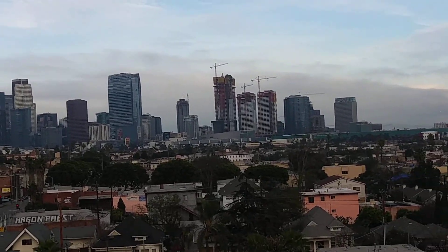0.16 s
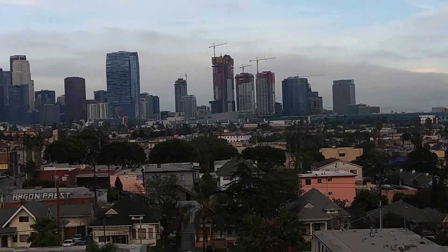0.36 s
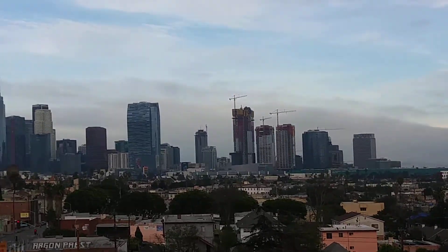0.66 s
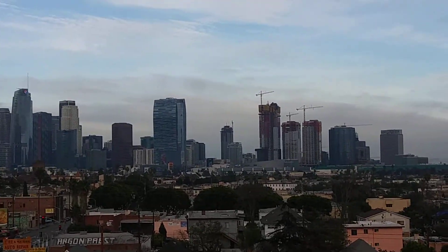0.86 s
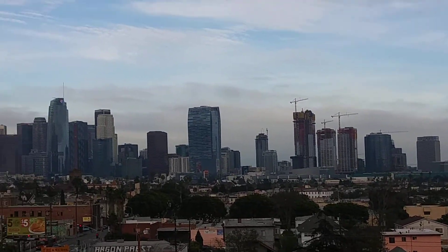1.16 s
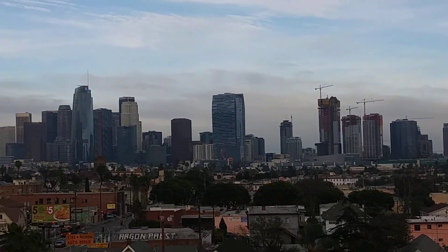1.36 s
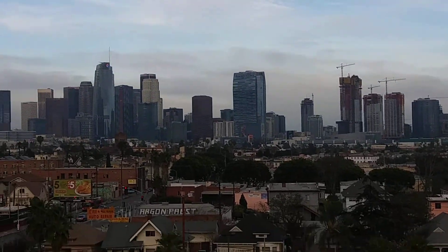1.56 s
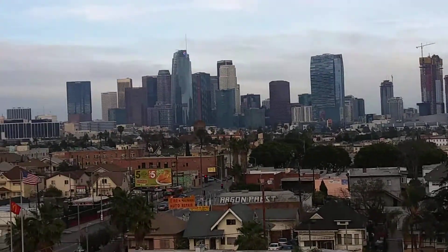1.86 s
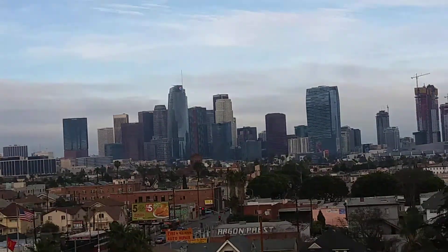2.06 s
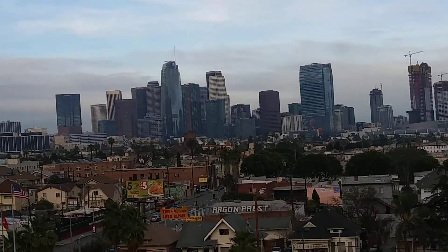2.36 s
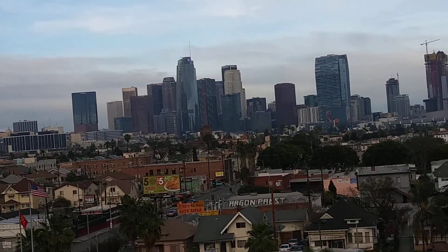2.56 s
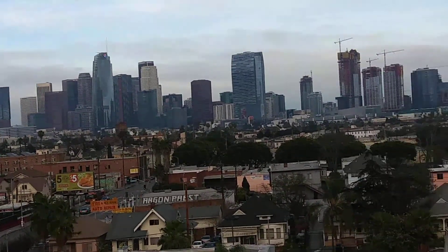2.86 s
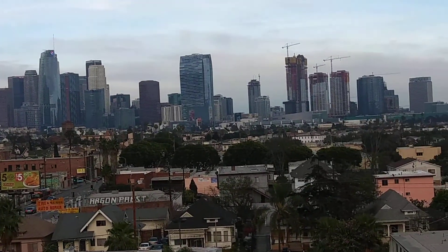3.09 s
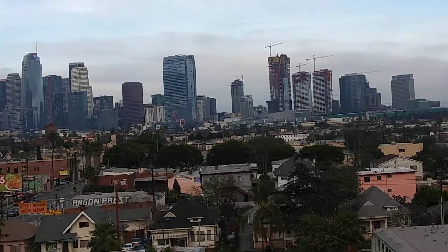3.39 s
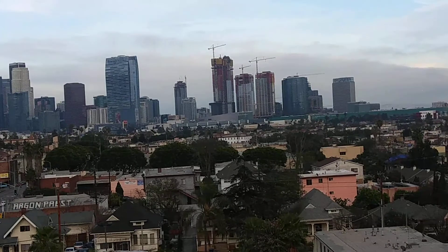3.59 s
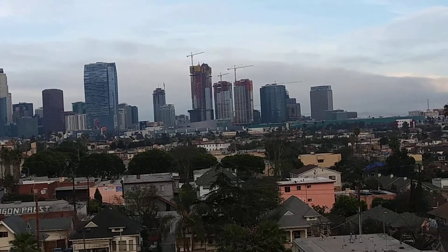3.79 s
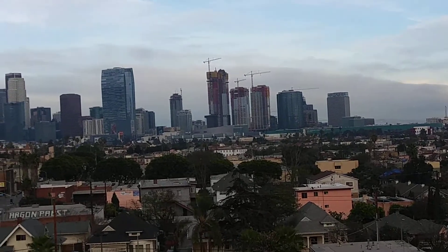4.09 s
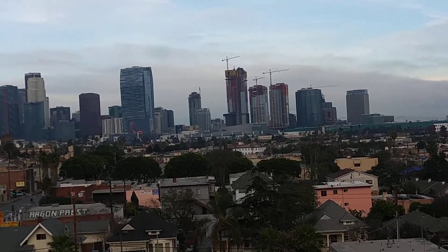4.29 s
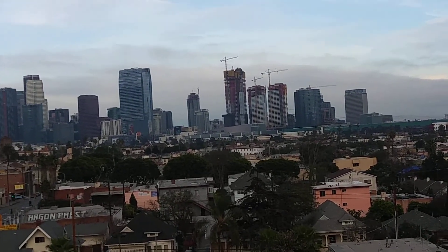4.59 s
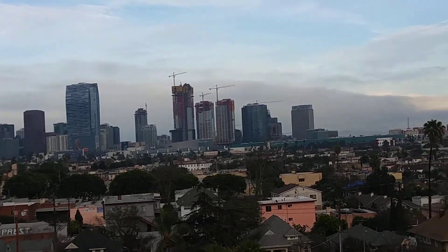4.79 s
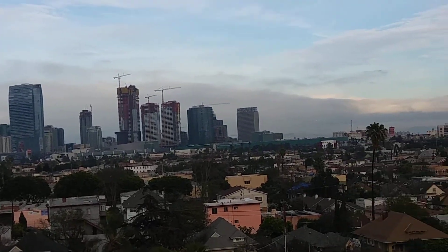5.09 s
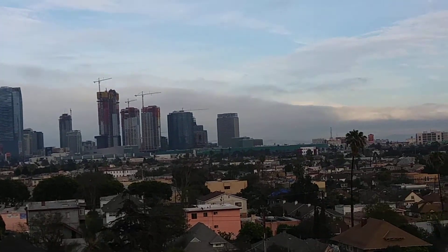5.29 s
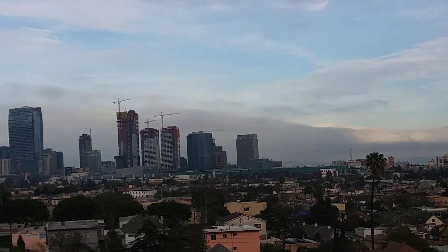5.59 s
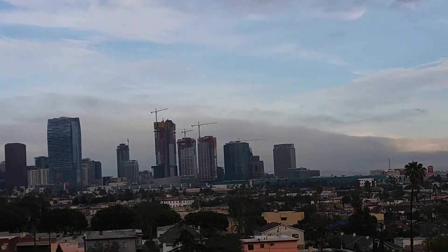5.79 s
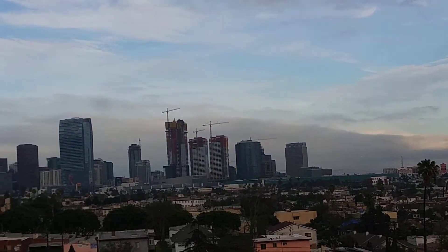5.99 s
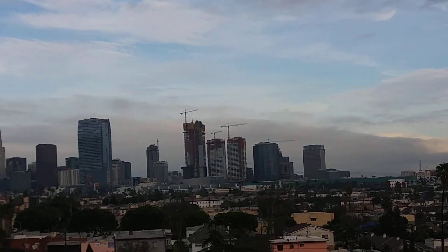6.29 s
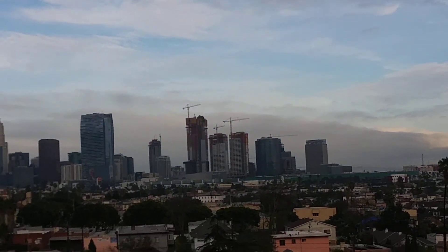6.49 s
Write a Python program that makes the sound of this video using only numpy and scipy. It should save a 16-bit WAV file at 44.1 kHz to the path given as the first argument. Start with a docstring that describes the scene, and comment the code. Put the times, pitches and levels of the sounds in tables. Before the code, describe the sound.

Close knocks, clatter and clicks of a handled phone over a low, wavering engine-like hum, a thin whine and distant city traffic.

```python
"""A low engine-like hum wanders in pitch under a thin steady whine, heard on a hand-held phone over a city.
Close by come a hollow knock ringing a body's modes, a hard clatter of rebounding parts and light clicks,
each with a short reverberant tail. The hand rubs and bumps the phone's case. There is one sharp click.
Behind it all lie rumble, a wash of traffic, a flickering hiss and a few faint, far squeals."""
import sys
import numpy as np
from scipy import signal
from scipy.fft import rfft, irfft, next_fast_len
from scipy.io import wavfile

SR = 44100
rng = np.random.default_rng(int(sys.argv[2]) if len(sys.argv) > 2 else 0)


def int16_out(signal):
    """Quantize to a 16-bit WAV file."""
    q = np.round(np.clip(np.atleast_2d(signal).T, -1, 1) * 32767)
    wavfile.write(sys.argv[1], SR, q.astype(np.int16))


N = 293264
TIME = np.arange(N) / SR


def from_db(db):
    """Decibels to gain."""
    return 10 ** (np.asarray(db) / 20)


def rms_one(x):
    """Scale to rms 1."""
    return x / np.sqrt(np.mean(x ** 2) + 1e-20)


def automation(points):
    """Read a breakpoint curve at every sample."""
    return np.interp(TIME, *np.transpose(points))


def at_hz(points, hz):
    """Read a table on a log-frequency axis."""
    freqs, values = np.transpose(points)
    return np.interp(np.log(hz + 1e-9), np.log(freqs), values)


def drift(rate_hz):
    """Smooth random modulation, rms 1."""
    hop, warm_up = 40, 2000
    pole = np.exp(-2 * np.pi * rate_hz * hop / SR)
    white = rng.standard_normal(N // hop + warm_up + 2)
    slow = signal.lfilter([1], [1, -2 * pole, pole * pole], white)[warm_up:]
    return np.interp(np.arange(N) / hop, np.arange(len(slow)), rms_one(slow))


def noise(colour):
    """Noise shaped by an EQ curve, rms 1."""
    size = next_fast_len(N)
    hz = np.arange(size // 2 + 1) * SR / size
    spectrum = rfft(rng.standard_normal(N), size) * from_db(at_hz(colour, hz))
    return rms_one(irfft(spectrum, size)[:N])


def cut(x, hz, kind, order):
    """Butterworth filter."""
    return signal.sosfilt(signal.butter(order, hz, kind, fs=SR, output="sos"), x)


def resonate(x, hz, width_hz):
    """A resonator with unity gain at its peak."""
    r = np.exp(-np.pi * width_hz / SR)
    feedback = [1, -2 * r * np.cos(2 * np.pi * hz / SR), r * r]
    return signal.lfilter(np.array([1, 0, -1]) * (1 - r * r) / 2, feedback, x + 1e-18)


def narrow_band(x, hz, width_hz):
    """Two resonators in series, rms 1."""
    return rms_one(resonate(resonate(x, hz, width_hz), hz, width_hz))


def add(out, start_s, sound):
    """Mix a sound in at a time."""
    start = max(round(start_s * SR), 0)
    out[start:start + len(sound)] += sound[:N - start]


def envelope(start_s, length_s, attack, release=0.42):
    """Rise, hold at 1 and fall; attack and release are shares of the length."""
    progress = (TIME - start_s) / length_s
    return np.clip(np.minimum(progress / attack, (1 - progress) / release), 0, 1)


def swell(crest_s, half_width_s, gain_db):
    """A bell-shaped rise and fall, in dB."""
    return gain_db * np.exp(-((TIME - crest_s) / half_width_s) ** 2)


# noise floor EQ (frequency [Hz], level [dB])
MIC_EQ = [(5000, 0), (9000, -3), (16000, -9)]

def mic_noise():
    """The microphone's own faint, steady noise."""
    return from_db(-82.5) * noise(MIC_EQ)


# EQs of the low rumble and the traffic wash (frequency [Hz], level [dB])
RUMBLE_EQ = [(15, -25), (30, -23), (45, -4), (65, 25), (90, 23.5), (125, 21.5), (160, 14), (300, 0),
             (500, -44)]
TRAFFIC_EQ = [(76, -5.5), (130, -3), (339, -8), (368, -9.5), (405, -12.5), (456, -9.5), (495, -16),
              (1030, -14.5), (1340, -18.5), (1910, -21), (2050, -24), (2200, -23), (2860, -48),
              (4840, -120)]

def city():
    """The bed: rumble and traffic dulled by distance, both swelling slowly."""
    rumble = from_db(-36.5 + swell(crest_s=3.7, half_width_s=1.7, gain_db=6.5)) * noise(RUMBLE_EQ)
    wash = cut(noise(TRAFFIC_EQ), 2260, "low", order=14)
    wash = cut(wash, 55, "high", order=3)
    return rumble + from_db(-33 + swell(crest_s=3.9, half_width_s=3.6, gain_db=4.03)) * wash


HISS_START_S, HISS_FADE_S, HISS_CREST_S = 1, 0.35, 5.65
# hiss EQ (frequency [Hz], level [dB])
HISS_EQ = [(2000, -8), (2300, 0), (2600, -3), (3100, -7), (3400, -20), (3900, -18), (4150, -21),
           (4450, -35), (8000, -51), (12000, -70)]
# flickering treble bands (centre [Hz], width [Hz], level [dB])
FLICKER_BANDS = [(2950, 220, -66), (3716, 140, -62.5), (4012, 70, -63.5), (5100, 560, -79.5),
                 (8016, 400, -80.5)]

def hiss():
    """A faint, flickering hiss fades up, builds slowly to a crest and recedes."""
    ramp_db = -3.5 * np.abs(TIME - HISS_CREST_S)
    out = from_db(-46.5 + ramp_db + 1.5 * drift(12)) * noise(HISS_EQ)
    for hz, width_hz, db in FLICKER_BANDS:
        band = narrow_band(rng.standard_normal(N), hz, width_hz)
        out += from_db(db + 0.77 * ramp_db + 4.3 * drift(6)) * band
    fade_up = np.clip((TIME - HISS_START_S) / HISS_FADE_S, 0.2, 1)
    return fade_up * out


def treble_puffs(puffs_per_s=31, puff_s=0.08, low_hz=2660, high_hz=5640, db_per_octave=-10):
    """Once the hiss is in, faint, narrow puffs of high noise flicker at random; higher ones are weaker."""
    out, white = np.zeros(N), rng.standard_normal(N)
    count = int(puffs_per_s * (N / SR - HISS_START_S))
    for when, height, strength, length in rng.random((count, 4)):
        start_s = np.interp(when, [0, 1], [HISS_START_S + HISS_FADE_S, N / SR - puff_s])
        end_s = start_s + puff_s * (.5 + length)
        octaves = height * np.log2(high_hz / low_hz)
        puff = narrow_band(white[int(start_s * SR):int(end_s * SR)], low_hz * 2 ** octaves, width_hz=220)
        level_db = -62.5 + db_per_octave * octaves + 6.5 * (2 * strength - 1)
        add(out, start_s, from_db(level_db) * np.hanning(len(puff)) * puff)
    return out


# EQ of the rough edge (frequency [Hz], level [dB])
RASP_EQ = [(3300, -28), (4050, 0), (4500, -21), (5150, 0.5), (5800, -18), (7900, -10.5), (9000, -13),
           (11000, -46)]
# squeal cues (time [s], length [s], pitch [Hz], glide [Hz/s], level [dB])
SQUEAL_CUES = [(3.39, 0.43, 818, 135, -39.5), (5.24, 0.35, 6350, 148, -57), (4.5, 0.37, 3000, 0, -55.5),
               (5.23, 0.18, 4050, 0, -57), (6.1, 0.19, 6800, 899, -65)]

def squeals():
    """Far, wavering tones, some gliding upward; a rasp of noise roughens one high pair."""
    rasp_gain = from_db(-62.5 + 4.5 * drift(25)) * envelope(start_s=5.2, length_s=0.3, attack=0.15)
    out = rasp_gain * noise(RASP_EQ)
    for start_s, length_s, hz, glide, level_db in SQUEAL_CUES:
        pitch = (hz + glide * (TIME - start_s)) * (1 + 0.0065 * drift(110))
        tone = np.sin(2 * np.pi * np.cumsum(pitch) / SR)
        out += from_db(level_db + 2 * drift(28)) * envelope(start_s, length_s, attack=0.15) * tone
    return out


def click(time_s=3.645):
    """One brief, sharp click: a sudden step that dies away at once."""
    out = np.zeros(N)
    add(out, time_s, -from_db(-12) * np.exp(-TIME[:SR // 5] / .0008))
    return out


# resonances of the hard parts (frequency [Hz], width [Hz], level [dB])
PART_MODES = [(1015, 40, -5), (1470, 50, -3), (1794, 14, 4), (1906, 40, 1), (2111, 14, 3), (2170, 25, -1),
              (2308, 14, -1), (2905, 30, 3), (2975, 25, 1), (3730, 35, 2), (3850, 30, -2), (4374, 50, -4),
              (4842, 40, 2), (5220, 60, -3), (5780, 40, 2), (6200, 40, -1), (6337, 45, 3), (6830, 25, -5),
              (7415, 40, 0), (7850, 60, -4), (8280, 39, -4), (8970, 100, -5)]

def hard_parts(x, ring_db):
    """Small stiff parts ring along with whatever excites them."""
    ring = sum(from_db(db) * resonate(x, hz, width_hz) for hz, width_hz, db in PART_MODES)
    return x + from_db(ring_db) * ring


# EQs of the dull and bright friction layers (frequency [Hz], level [dB])
DULL_RUB_EQ = [(2000, 5), (2900, 8), (3700, 9), (5000, 6), (6500, -7), (8500, -15.5), (16000, -31.5)]
BRIGHT_RUB_EQ = [(3000, -3.5), (7000, -2.5), (10000, -6.5), (13000, -16.5), (16000, -22.5)]
# finger slides (time [s], length [s], level [dB], bright layer [dB])
RUB_CUES = [(1.563, 0.3, -59.5, -32), (1.86, 0.15, -49, -31), (2.031, 0.29, -54, -22),
            (2.5, 0.17, -66, -22), (3.19, 0.21, -49, -1)]
# soft bumps on the case (time [s], level [dB], pitch [Hz])
BUMP_CUES = [(0.658, -15, 90), (3.658, -10.5, 110), (3.78, -9.5, 110), (3.831, -15, 63.07),
             (3.925, -2.5, 161), (4.029, -8, 110), (4.101, -9.5, 180), (5.54, -14.5, 75), (5.618, -15, 75)]

def hand():
    """Skin slips on the case in small grains and bumps it in damped thuds."""
    out, t = np.zeros(N), TIME[:SR // 5]
    dull, bright = hard_parts(noise(DULL_RUB_EQ), ring_db=3), noise(BRIGHT_RUB_EQ)
    grain = from_db(3.5 * drift(35))
    for start_s, length_s, level_db, bright_db in RUB_CUES:
        friction = grain * (dull + from_db(bright_db) * bright)
        out += from_db(level_db) * envelope(start_s, length_s, attack=0.35) * friction
    for start_s, level_db, hz in BUMP_CUES:
        thud = np.sin(2 * np.pi * hz * t) + from_db(-3.5) * np.sin(2 * np.pi * 1.3 * hz * t)
        attack = 1 - np.exp(-t / .003)
        add(out, start_s, from_db(level_db + 1 - 60 * t / 0.063) * attack * thud)
    return out


# reverb decay of the surroundings (frequency [Hz], t60 [s])
REVERB_DECAY = [(200, .7), (1000, 0.66), (3000, 0.47), (6000, 0.39), (10000, 0.33), (16000, .3)]

def impacts(hits, colour, rise_s, ring_t60, crack_db, tail_db):
    """Each hit is banded noise: a crack, a dense ring that dies sooner in the treble, a reverb tail."""
    t, out = TIME[:SR * 3 // 5], np.zeros(N)
    edges = np.geomspace(140, 17000, 17)
    centres = np.sqrt(edges[1:] * edges[:-1])
    colour_rms = np.sqrt(np.sum(from_db(at_hz(colour, centres)) ** 2 * np.diff(edges)) * 2 / SR)
    times, level_db, low_db, top_db = np.transpose(hits)[:, :, None]
    white, sounds = rng.standard_normal((len(hits), 2, len(t))), 0
    for k, hz in enumerate(centres):
        ring = from_db(-60 * t / (ring_t60 * (hz / 4000) ** -.35))
        crack = from_db(crack_db - 60 * t / 0.02) * (hz / 4000) ** .5
        bloom = 1 - np.exp(-t / 0.042)
        tail = from_db(tail_db - 60 * t / at_hz(REVERB_DECAY, hz)) * bloom / (1 + (hz / 8000) ** 2)
        octaves = np.log2(hz / 5000)   # both shelves hinge at 5 kHz
        shelves_db = low_db * np.clip(-octaves / 2, 0, 1) + top_db * np.clip(octaves, 0, 1)
        gain = from_db(level_db + at_hz(colour, hz) + shelves_db) / colour_rms
        band = cut(white[:, k % 2], edges[k:k + 2], "band", order=2)
        sounds = sounds + gain * (crack + ring + tail) * band
    for start_s, sound in zip(times[:, 0], sounds):
        add(out, start_s, sound * (1 - np.exp(-t / rise_s)))
    return out


# resonances of the hollow body (frequency [Hz], level [dB], t60 [s])
BODY_MODES = [(250, -18, .35), (294, -13, .35), (345, -11, .55), (371, -16, .4), (417, -18, .5),
              (470, -18, .8), (652, -13, .65), (826, -7, .22), (874, -6, .11), (931, -8, .13),
              (1012, -16, .25), (1240, -19, .2), (1700, -17, .15)]
# scuff EQ (frequency [Hz], level [dB])
SCUFF_EQ = [(150, -12), (330, -11), (550, -10), (900, -4.5), (1300, -10), (2200, -7), (3500, -9.5),
            (6000, -9), (9000, -19), (15000, -31.5)]
# contacts that make up the knock (time [s], relative level [dB], scuff treble [dB])
KNOCK_HITS = [(0.307, -19.5, -11), (0.321, -13, -8), (0.3298, -2.5, -10), (0.351, -15.5, -7),
              (0.380, -12.5, -7.5)]

def knock():
    """A blunt knock feeds the modes of a hollow body, with a rough scuff on top."""
    t = TIME[:SR * 3 // 2]
    hz, mode_db, t60 = np.transpose(BODY_MODES)[:, :, None]
    energy, body = 0, np.zeros(N)
    for start_s, level_db, _ in KNOCK_HITS:
        age = np.maximum(t - start_s, 0)
        attack = 1 - np.exp(-age / 0.00044)
        energy = energy + (from_db(level_db + mode_db - 60 * age / t60) * attack) ** 2
    tones = np.sin(2 * np.pi * (hz * t + rng.random(hz.shape)))
    add(body, 0, np.sum(np.sqrt(energy) * tones, axis=0))
    scuff_hits = [(start_s, db + treble_db, -treble_db, 0) for start_s, db, treble_db in KNOCK_HITS]
    scuff = impacts(scuff_hits, SCUFF_EQ, rise_s=0.0033, ring_t60=0.19, crack_db=1.5, tail_db=-15.5)
    return from_db(-4) * body + from_db(-6) * scuff


# EQs of the hard clacks and light clicks (frequency [Hz], level [dB])
CLACK_EQ = [(150, -33), (300, 0), (500, -4.5), (900, 0.5), (1900, 0), (3000, 2.5), (4300, -3), (6300, -1.5),
            (9000, -13.5), (12000, -20.5), (15500, -32)]
CLICK_EQ = [(500, 11.5), (1400, 12.5), (2800, 9), (4300, 7), (6300, 6), (8500, -14.5), (10000, -32.5),
            (13000, -21.5), (15500, -26.5)]
# their hits (time [s], relative level [dB], low shelf [dB], high shelf [dB])
CLACK_HITS = [(0.645, -34, 14, -8.5), (0.6536, -12.5, 1.5, 11.5), (0.6658, -1.5, 4, 5.5),
              (0.6957, 1, -0.5, 6.5), (0.7033, -3.5, 0.5, 0), (0.7255, -0.5, -0.5, -17),
              (0.737, -12, 6, -16), (0.7591, -5, 0.5, 0), (0.7731, -3.5, -1, -30), (0.7924, -5, 1, -10),
              (0.832, -12, 5.5, -13), (0.8998, -11.5, 3.5, -0.5), (0.9325, -8, -4, -4),
              (0.971, -25, 11, -11)]
CLICK_HITS = [(0.0504, -33, 3, 24), (1.2855, -17, -23.5, 22.5), (1.296, -23.5, -5, -10),
              (1.3444, -25, -2.5, -15.5), (1.4229, -25.5, 0.5, 15.5), (1.9976, -16, 0.5, -1),
              (2.008, -27, 7, 25), (2.0201, -14, 1.5, -2.5), (2.0891, -27, 10, -20), (2.2031, -30, 5.5, 4),
              (3.3212, -35, 4.5, 17.5)]

def clatter():
    """Hard parts strike and rebound in one quick rattle, among scattered lighter clicks."""
    clacks = impacts(CLACK_HITS, CLACK_EQ, rise_s=0.00043, ring_t60=0.1, crack_db=-0.5, tail_db=-15)
    clicks = impacts(CLICK_HITS, CLICK_EQ, rise_s=0.0013, ring_t60=0.12, crack_db=3, tail_db=-7.5)
    rattle = from_db(-13.5) * hard_parts(clacks, ring_db=4.5)
    return rattle + from_db(-12) * hard_parts(clicks, ring_db=0.5)


# pitch automation of the drone (time [s], pitch [Hz])
DRONE_PITCH = [(0.0, 66), (0.44, 76.21), (0.94, 84.15), (1.18, 94.4), (1.5, 98.6), (2.3, 102.8),
               (2.96, 90.4), (3.58, 95.03), (5.65, 98.1), (6.15, 92.36), (6.45, 94.5), (6.65, 89.8)]
# level automation of the drone (time [s], level [dB])
DRONE_LEVEL = [(0, -36.5), (0.9, -31.5), (1.0, -23), (1.5, -18), (3.7, -16), (4.8, -20.5), (5.2, -32),
               (5.72, -31.5), (5.95, -22), (6.65, -21.5)]
# partials of the drone (pitch multiple [ratio], level [dB])
DRONE_PARTIALS = [(2 / 3, -30.5), (1, 0), (4 / 3, -21.5), (3 / 2, -24), (2, -23), (3, -31)]

def hum(whine_hz=2000):
    """An engine-like drone, nearly a sine with weak side partials; a thin whine stands above it."""
    pitch = automation(DRONE_PITCH) * (1 + .004 * drift(4.3))
    phase = 2 * np.pi * np.cumsum(pitch) / SR
    drone = sum(from_db(db) * np.sin(multiple * phase) for multiple, db in DRONE_PARTIALS)
    whine = np.sin(2 * np.pi * np.cumsum(whine_hz + .8 * drift(5)) / SR)
    whine_db = -48 + swell(crest_s=2.84, half_width_s=1, gain_db=8.5) + 0.89 * drift(8)
    drone_db = automation(DRONE_LEVEL) + 1.3 * drift(26)
    return np.sqrt(2) * (from_db(drone_db) * drone + from_db(whine_db) * whine)


def scene():
    """Mono mix of all the layers over the noise floor."""
    near = knock() + clatter() + hand()
    ambience = hum() + city() + hiss() + squeals() + treble_puffs()
    return (near + ambience + click() + mic_noise())[None]


def record(dry):
    """Soft clipping rounds the peaks; a steep low-pass cuts the top."""
    rounded = 1.059 * np.tanh(dry / 1.152)
    return signal.sosfilt(signal.ellip(10, .1, 80, 15900, fs=SR, output="sos"), rounded)


dry = scene()
out = record(dry)
int16_out(out)
```